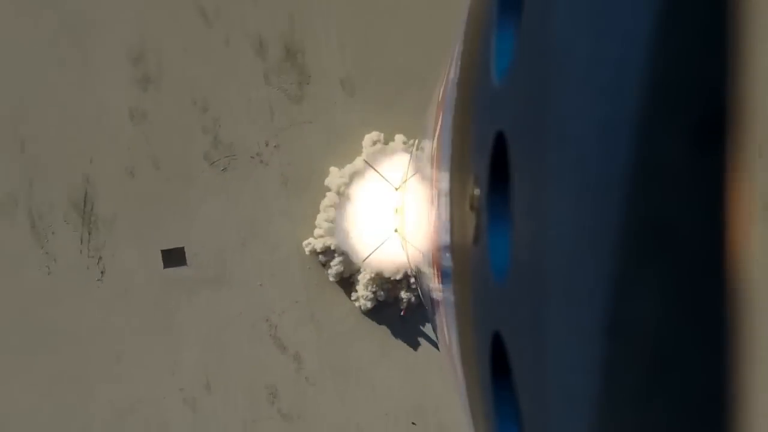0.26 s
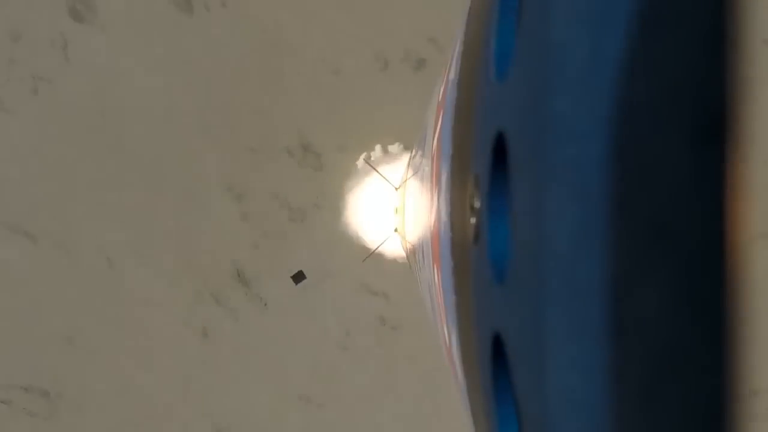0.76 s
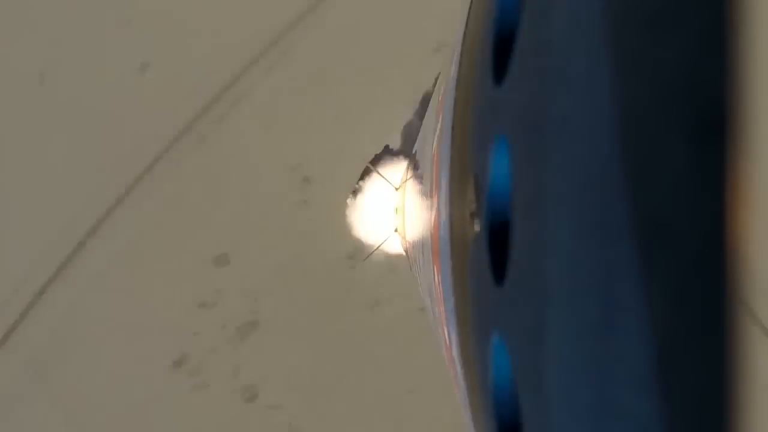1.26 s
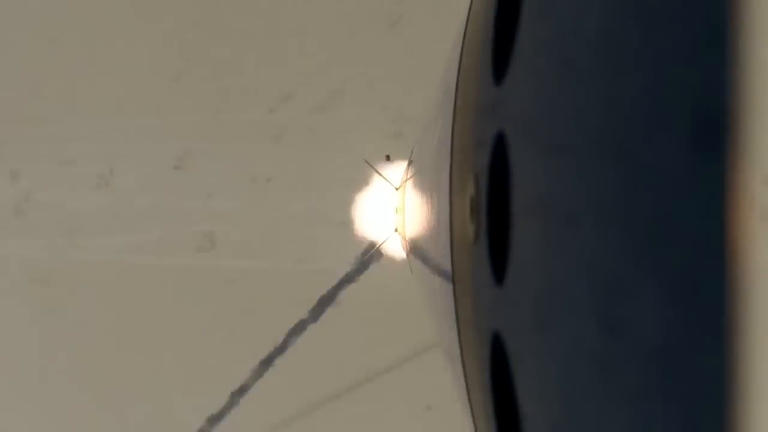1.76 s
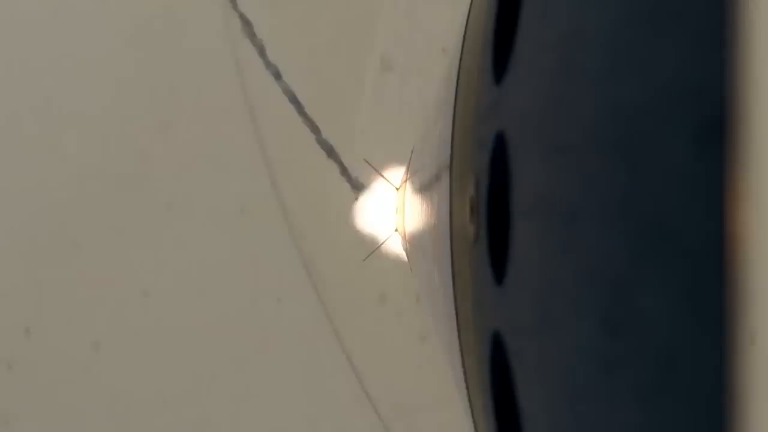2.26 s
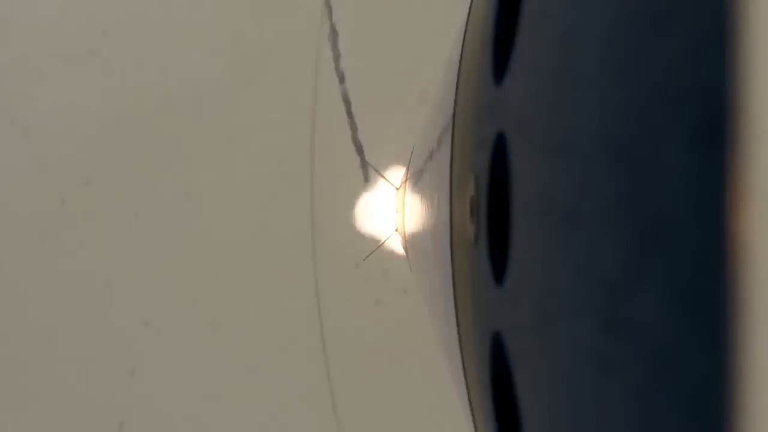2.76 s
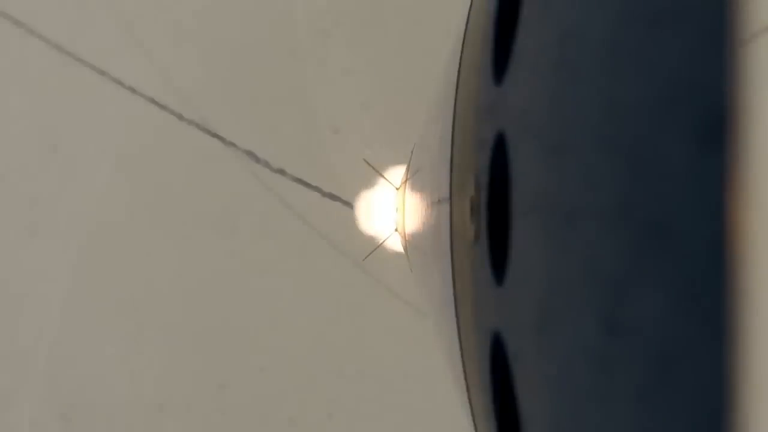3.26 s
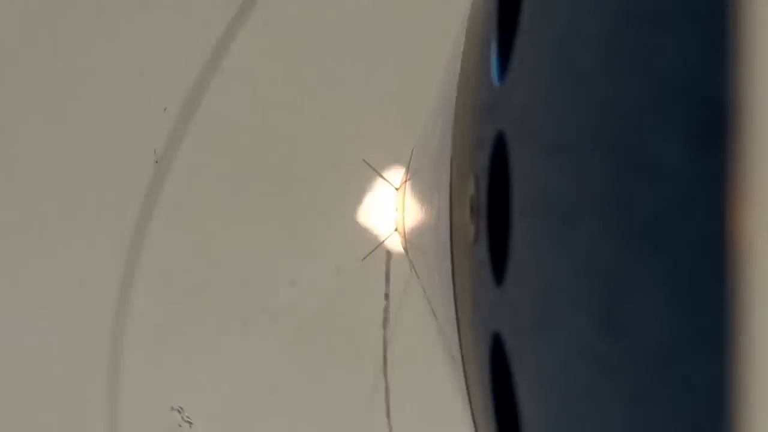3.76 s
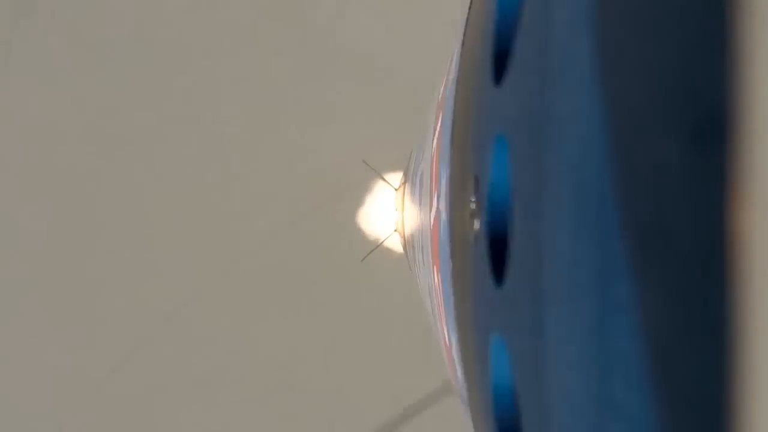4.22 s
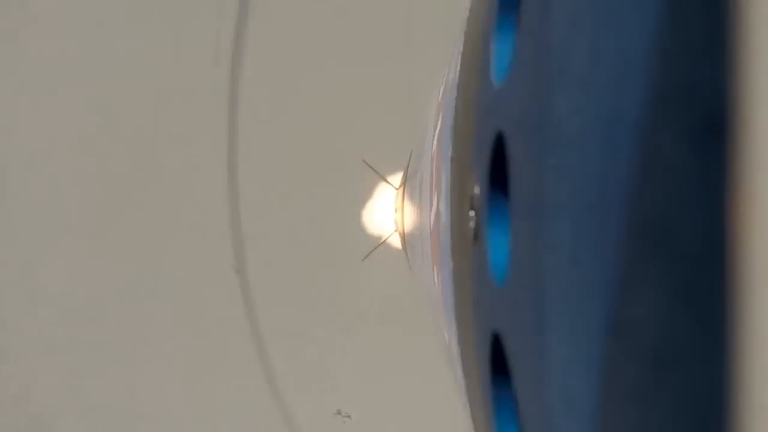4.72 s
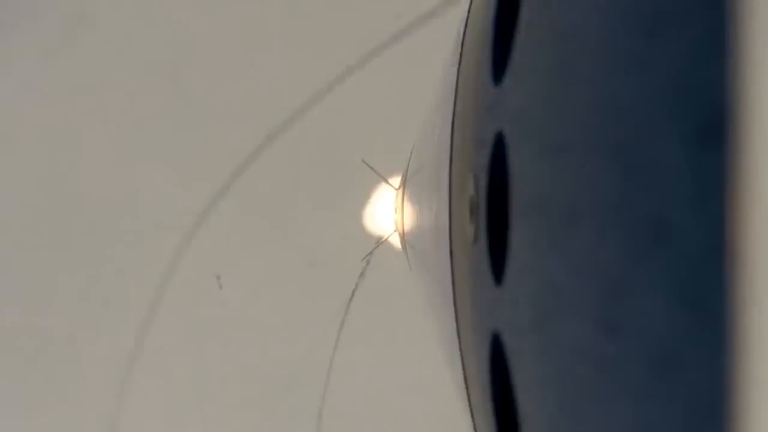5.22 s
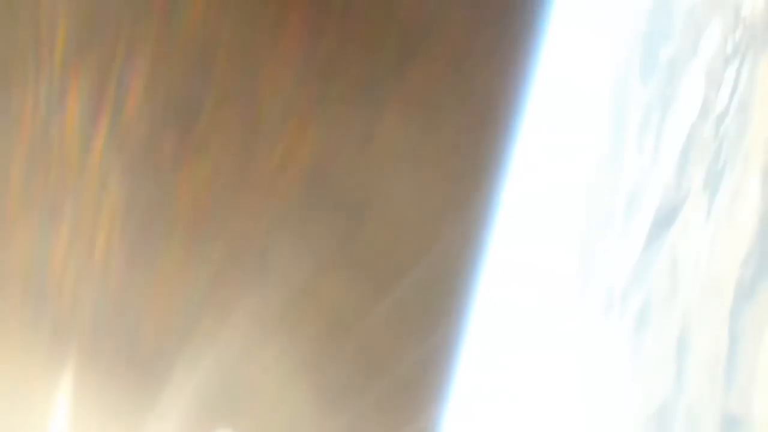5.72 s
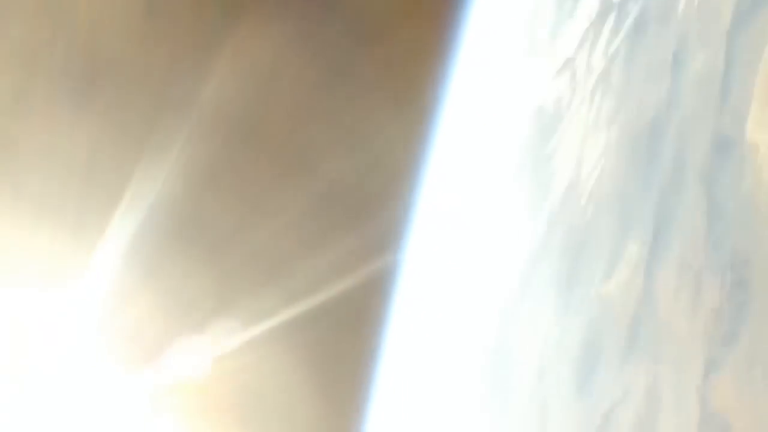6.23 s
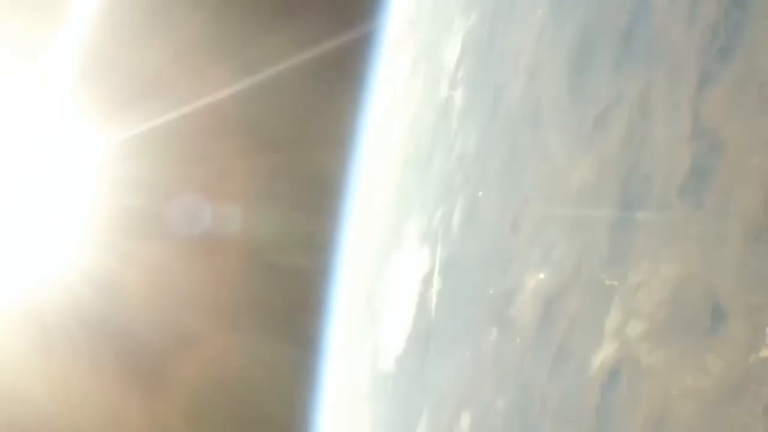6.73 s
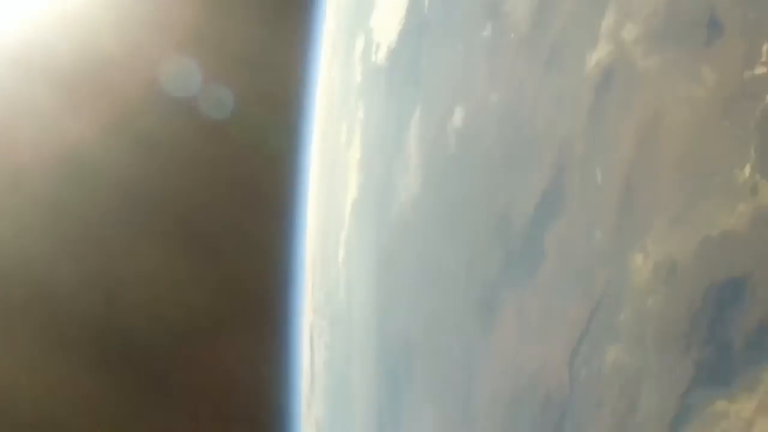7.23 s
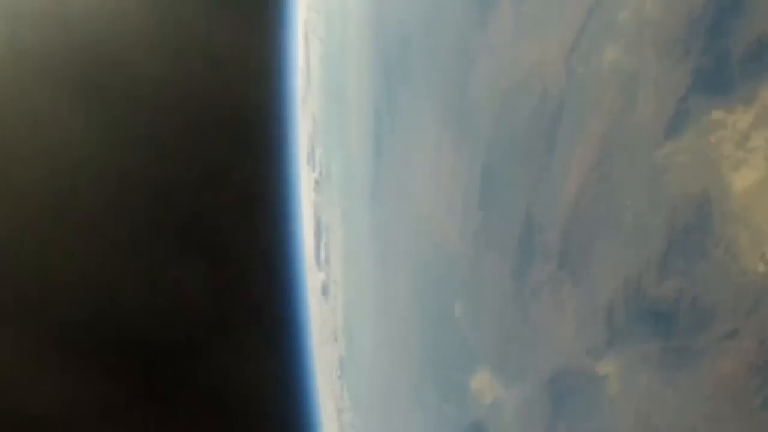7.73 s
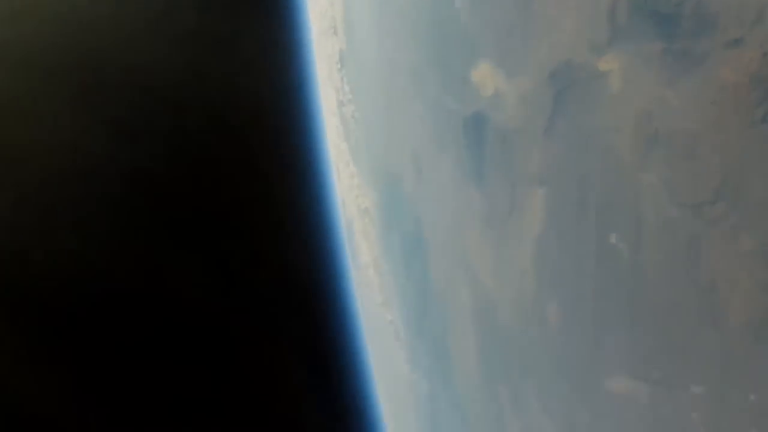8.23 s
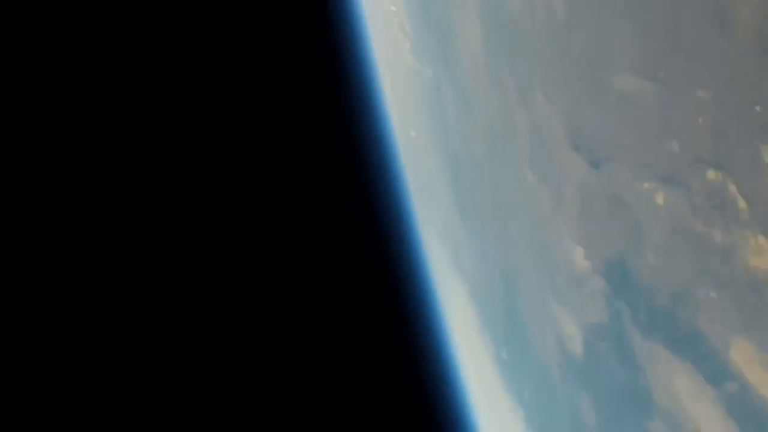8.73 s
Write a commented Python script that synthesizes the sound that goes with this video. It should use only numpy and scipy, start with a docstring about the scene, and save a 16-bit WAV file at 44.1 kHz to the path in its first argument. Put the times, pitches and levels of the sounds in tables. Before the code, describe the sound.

A rocket motor roars loudly, heard from on board, then cuts off abruptly, leaving a faint hush with small knocks and ticks.

```python
"""On the side of a climbing rocket, a camera hears the motor at liftoff. Turbulent jet noise rings through
the resonances of the airframe; the rumble reflected by the ground falls away with height, and the
rushing air brightens with speed. After a hard cut the rocket coasts high up in near silence, where
loose parts inside knock and tick, each impact exciting damped modes of vibration."""
import sys
import numpy as np
from scipy import signal
from scipy.fft import rfft, irfft
from scipy.io import wavfile
from scipy.ndimage import uniform_filter1d

SR = 44100
rng = np.random.default_rng(int(sys.argv[2]) if len(sys.argv) > 2 else 0)


def to_wav(sig):
    """Store sig (one row per channel, or 1-D mono) as 16-bit WAV at the path in sys.argv[1].

    Samples outside -1..1 are clipped; the rate is SR.
    """
    pcm = np.clip(np.atleast_2d(sig), -1, 1) * 32767
    pcm = np.round(pcm).astype(np.int16)
    wavfile.write(sys.argv[1], SR, pcm.T)  # frames by channels


N = 396302
TIME = np.arange(N) / SR
CUT_S, COAST_S = 5.639, 5.847

# base spectrum of the jet noise: frequency_hz, density_db
JET_SPECTRUM = [(20, -57), (45, -50.5), (140, -57), (250, -58), (700, -54), (1500, -52), (2800, -58),
                (5700, -66), (8500, -74), (9500, -79.5), (11700, -84), (12400, -89.5), (13600, -91),
                (14300, -97.5)]
# strength of the roar over the burn: time_s, gain_db
THRUST_CURVE = [(0, 0.4), (.47, 0.7), (.62, 2), (1.35, 2), (2.0, 2.0), (3.1, 0.6), (4.5, -0.5), (5.64, 0)]
# peaks and hollows of the exhaust near the pad: centre_hz, width_hz, gain_db
PAD_BANDS = [(105, 22, 3), (200, 22, -4.5), (370, 24, -2), (496, 25, 3), (600, 51, -7), (2125, 280, -3.5),
             (2370, 31, 5.5), (3530, 45, 2), (7200, 990, 3.5), (7890, 130, 2), (11620, 1800, -1)]
# steady resonances and hollows of the airframe: centre_hz, width_hz, gain_db
AIRFRAME_BANDS = [(98, 10, 1.3), (177, 9, 7.3), (202, 15, 7.3), (600, 29, 6.7), (780, 35, 2.5),
                  (970, 83, 4.8), (1086, 9, 2.0), (1214, 30, 3.4), (1367, 31, 2.1), (1440, 98, 4.1),
                  (1715, 26, 1.7), (1899, 16, 3.0), (2012, 18, 3.2), (2343, 96, 4.4), (3138, 24, -4.1),
                  (3219, 35, 2.3), (3449, 140, 3.5), (3535, 15, 0.8), (3794, 30, 3.1), (3997, 53, 3.0),
                  (4206, 84, -2.1), (4337, 28, 3.9), (4443, 42, 3.0), (4550, 39, -3.1), (4794, 140, 1.5),
                  (5256, 43, 3.2), (5787, 105, -4.9), (6865, 72, -2.2), (7683, 30, 3.8), (7882, 61, 4.9)]
# panel modes that ring hardest midway through the burn: centre_hz, width_hz, peak_gain_db
PANEL_MODES = [(177, 4.9, 4), (1380, 16, 6.5), (3530, 27, 7.5), (3814, 22, 1), (4320, 21, 1.5),
               (7920, 35, 1), (7850, 700, 1)]
# resonances that only fast air excites: centre_hz, width_hz, full_speed_gain_db
FAST_AIR_MODES = [(183, 8.1, 4), (412, 14, 2.5), (4913, 100, 6.5), (6200, 171, 7)]
# howls that swell and pass: peak_s, spread_s, centre_hz, width_hz, gain_db
AIR_HOWLS = [(1.049, 0.41, 1735, 177.7, 8), (1.502, .14, 303, 60.2, 9)]
# background of the coast: frequency_hz, density_db
HUSH_SPECTRUM = [(10, -102), (25, -84), (110, -80.5), (260, -82), (520, -92), (740, -93.5), (900, -100),
                 (2600, -107.5), (4000, -109), (5200, -115), (6050, -127), (7100, -116), (8200, -113),
                 (9500, -118), (15000, -117)]
# impacts of loose parts: start_s, tube_db, bulkhead_db, bracket_db, chatter_s
LOOSE_KNOCKS = [(5.866, -46, -57, -57, .02), (5.895, -45, -65, -68, 0.046), (6.055, -58, -69, -60, .025),
                (6.117, -33.5, -57, -50.5, 0.022), (6.36, -63, -60, -52.5, 0.029),
                (6.575, -62, -60, -57, .045), (6.692, -54, -62, -57, .03), (7.271, -51, -58, -53.5, 0.011),
                (7.307, -54, -62, -55, .015), (7.349, -47, -47, -42, .018), (7.455, -59, -62, -60, 0.012),
                (7.916, -54, -70, -70, .016), (8.139, -40.5, -39, -46, .028), (8.168, -39, -51, -66, 0.031),
                (8.297, -42, -57, -63, .012), (8.535, -66, -67, -60, .015), (8.572, -42, -67, -64, 0.028),
                (8.845, -59, -64, -61, .025)]
# modes that a knock rings: pitch_hz, relative_db, t60_s, part (0 tube, 1 bulkhead, 2 bracket)
BAY_MODES = [(140, -19, .35, 0), (267.7, 3.5, 0.13, 0), (316, -6, 0.17, 0), (408, 9, 0.051, 1),
             (457, -4, 0.057, 1), (685, 1, 0.077, 2), (743, -0.5, 0.082, 2), (1210, -4, 0.04, 2),
             (1720, 0, .05, 2)]
# small hard impacts: start_s, ring_db, contact_db
HARD_TICKS = [(6.117, -54, -58), (6.297, -60, -72), (6.361, -66, -60), (6.62, -66, -76), (6.684, -64, -58),
              (6.803, -70, -72), (7.007, -65, -74), (7.272, -66, -54.5), (7.297, -60, -64),
              (7.578, -62, -72), (8.141, -66, -58), (8.183, -59, -70), (8.825, -59, -68)]
# modes that a tick rings: pitch_hz, relative_db, t60_s
PING_MODES = [(3730, 1, 0.042), (3880, -1, 0.046), (4060, -7, .04), (8150, -5, .05), (8300, -12, .04)]
# colour of a tick's dry scratch as heard through the coarse sampler, with its notch near 6 kHz:
# frequency_hz, relative_db
SAMPLED_SCRATCH_SPECTRUM = [(300, -8), (1200, 1), (2200, -2), (4600, -14), (6050, -25), (7400, -14),
                            (14000, -20)]


def amp(db):
    """The amplitude ratio of a level in decibels."""
    return 10 ** (np.asarray(db) / 20)


def spectrum_db(points, hz):
    """A spectrum interpolated linearly on a log-frequency axis."""
    point_hz, db = np.transpose(points)
    return np.interp(np.log(hz + 1), np.log(point_hz), db)


def bell(v, centre, width):
    """A Gaussian of height 1 whose width is its standard deviation."""
    return np.exp(-.5 * ((v - centre) / width) ** 2)


def bands_db(rows, hz):
    """Gains in cascade add in decibels: one bell for each peak or hollow."""
    return sum(db * bell(hz, centre_hz, width_hz) for centre_hz, width_hz, db in rows)


def unit_rms(x):
    """Normalisation to a mean power of 1."""
    return x / np.sqrt(np.mean(x ** 2) + 1e-20)


def coloured(x, points):
    """Filtering as multiplication in the frequency domain."""
    hz = np.fft.rfftfreq(len(x), 1 / SR)
    return irfft(rfft(x) * amp(spectrum_db(points, hz)), len(x))


def white():
    """White noise has a flat power density, here 0 dB per Hz."""
    return rng.standard_normal(N) * np.sqrt(SR / 2)


def wander(samples):
    """A moving average of noise leaves its slow fluctuations, scaled to rms 1."""
    return unit_rms(uniform_filter1d(rng.standard_normal(N), samples))


def add(mix, start_s, sound):
    """Superposition: a sound adds to the mix from start_s on."""
    part = mix[round(start_s * SR):][:len(sound)]
    part += sound[:len(part)]


def jet_roar(eddy_db=0.75, low_cut_hz=21):
    """Source and filter: turbulence makes broadband noise, which ground, airframe and airflow colour."""
    frames = dict(fs=SR, nperseg=4096, noverlap=3072)
    hz, t, noise = signal.stft(white(), **frames)
    hz = hz[:, None]
    db = spectrum_db(JET_SPECTRUM, hz) + ground_db(hz, t) + airframe_db(hz, t)
    db += wall_ripple_db(hz, t) + airflow_db(hz, t)
    # eddies lift patches of the spectrum for a moment
    eddies = uniform_filter1d(rng.standard_normal(noise.shape), 24, axis=0)
    db += eddy_db * unit_rms(uniform_filter1d(eddies, 3, axis=1))
    sound = signal.istft(noise * amp(db), **frames)[1][:N]
    sound = signal.sosfilt(signal.butter(4, low_cut_hz, "high", fs=SR, output="sos"), sound)
    return sound * amp(burn_db())


def burn_db(flutter_db=0.29, surge_db=0.45, sag_db=-3, sag_start_s=1.69, sag_end_s=1.795, edge_s=0.01265):
    """Amplitude modulation: the roar follows thrust, sags once, and wavers with uneven burning."""
    thrust = np.interp(TIME, *np.transpose(THRUST_CURVE))
    sag = (np.tanh((TIME - sag_start_s) / edge_s) - np.tanh((TIME - sag_end_s) / edge_s)) / 2
    return thrust + sag_db * sag + flutter_db * wander(500) + surge_db * wander(4000)


def ground_db(hz, t, near_db=17, far_db=-1.8, corner_hz=125, rumble_half_s=1.03, pad_half_s=1.32):
    """Ground reflection reinforces the bass; it fades with height, as does the exhaust's pad colour."""
    nearness = 1 / (1 + (t / rumble_half_s) ** 2.5)
    rumble = (far_db + (near_db - far_db) * nearness) / (1 + (hz / corner_hz) ** 6)
    return rumble + bands_db(PAD_BANDS, hz) / (1 + (t / pad_half_s) ** 4)


def airframe_db(hz, t, tube_db=14, rest_hz=439, fast_hz=407, boom_rest_db=-2.5, boom_fast_db=2.45):
    """Forced resonance: the body favours its modes; the tube's sinks and booms harder with speed."""
    speed = np.minimum(t / CUT_S, 1)
    tube = tube_db * bell(hz, rest_hz + (fast_hz - rest_hz) * speed, width=76.2)
    booming = (1 + np.tanh((t - 2.78) / .8)) / 2  # half grown at 2.78 s
    boom = (boom_rest_db + (boom_fast_db - boom_rest_db) * booming) * bell(hz, centre=414, width=140)
    panels = bands_db(PANEL_MODES, hz) * bell(t, centre=2.35, width=1.1)
    fast_modes = bands_db(FAST_AIR_MODES, hz) * speed ** 2.8
    return bands_db(AIRFRAME_BANDS, hz) + tube + boom + panels + fast_modes


def wall_ripple_db(hz, t, depth_db=1.9, corner_hz=3000, fade_s=8):
    """Modal overlap: countless weak wall modes ripple the treble until the rush of air masks them."""
    modes = uniform_filter1d(rng.standard_normal(hz.shape), 4, axis=0)
    ripple = unit_rms(uniform_filter1d(modes, 3, axis=0))
    return depth_db * ripple * hz / (hz + corner_hz) * np.exp(-t / fade_s)


def airflow_db(hz, t, settle_s=1.23, corner_hz=1500, whistle_db=3.5, whistle_hz_per_s=3770):
    """Flow noise moves up in frequency with speed: the treble brightens, howls pass, a whistle rises."""
    rest_slope, fast_slope = -10.5, 1.04  # dB per octave
    slope = fast_slope + (rest_slope - fast_slope) * np.exp(-t / settle_s)
    octaves = np.log2(1 + (hz / corner_hz) ** 2) / 2
    howls = sum(db * bell(t, peak_s, spread_s) * bell(hz, centre_hz, width_hz)
                for peak_s, spread_s, centre_hz, width_hz, db in AIR_HOWLS)
    pitch_hz = 2600 + whistle_hz_per_s * t
    whistle = whistle_db * bell(t, centre=2.4, width=.45) * bell(hz, pitch_hz, width=.018 * pitch_hz)
    return slope * octaves + howls + whistle


def hush(gain_db=0.35, waver_db=0.9):
    """Slow random modulation of low noise gives a slightly wavering hush."""
    level_db = gain_db + waver_db * wander(3000)
    return coloured(white(), HUSH_SPECTRUM) * amp(level_db)


def knock(levels_db, chatter_s, bounce=0.29, dull_hz=900, low_cut_hz=170):
    """Impulse response: a loose part lands and chatters, each soft contact ringing the bay's modes."""
    t = np.arange(SR // 3) / SR
    contacts = np.zeros(len(t))
    rebounds = (rng.random(6) * chatter_s * SR).astype(int)
    contacts[rebounds] = bounce * rng.standard_normal(len(rebounds))
    contacts[0] = 1
    contacts = signal.sosfilt(signal.butter(4, dull_hz, fs=SR, output="sos"), contacts)
    contacts = signal.sosfilt(signal.butter(2, low_cut_hz, "high", fs=SR, output="sos"), contacts)
    sound = np.zeros(len(t))
    for struck, level_db in enumerate(levels_db):
        response = sum(amp(db - 60 * t / t60_s) * np.sin(2 * np.pi * hz * t)
                       for hz, db, t60_s, part in BAY_MODES if part == struck)
        ring = signal.fftconvolve(contacts, response)[:len(t)]
        # the heavy tube takes longer to start ringing than the light parts
        rise_s = 0.75 * chatter_s / (1 + struck) ** 2
        ring *= 1 - np.exp(-t / rise_s)
        power = np.sum(ring ** 2) / (0.027 * SR)  # as if all its energy fell within 27 ms
        sound += amp(level_db) * ring / np.sqrt(power)
    return sound


def sampler_images(x, clock_hz=11985, image_db=-29.0):
    """Spectral imaging: a coarse sampler mirrors the low knocks faintly about its clock rate."""
    low = signal.sosfilt(signal.butter(2, [250, 1000], "band", fs=SR, output="sos"), x)
    return amp(image_db) * 2 * low * np.cos(2 * np.pi * clock_hz * TIME)


def tick(ring_db, contact_db, scratch_t60_s=0.092, rise_s=0.0015):
    """A brief, hard contact excites high modes: a short bright ping with a dry scratch."""
    t = np.arange(SR // 10) / SR
    ping = sum(amp(db - 60 * t / t60_s) * np.sin(2 * np.pi * (hz * t + rng.random()))
               for hz, db, t60_s in PING_MODES)
    noise = unit_rms(coloured(rng.standard_normal(len(t)), SAMPLED_SCRATCH_SPECTRUM))
    scratch = amp(-60 * t / scratch_t60_s) * noise
    return (amp(ring_db) * ping + amp(contact_db) * scratch) * (1 - np.exp(-t / rise_s))


def coast():
    """With no roar to mask them, knocks and ticks stand out over the hush."""
    sound = hush()
    for start_s, *levels_db, chatter_s in LOOSE_KNOCKS:
        add(sound, start_s, knock(levels_db, chatter_s))
    for start_s, ring_db, contact_db in HARD_TICKS:
        add(sound, start_s, tick(ring_db, contact_db))
    return sound


def scene(snap_db=-22, tail_db=-26.5, tail_t60_s=0.058):
    """Superposition in mono: the roar stops with a snap and a faint tail; silence, then the coast."""
    since_cut_s = np.maximum(TIME - CUT_S, 0)
    burn_gate = np.where(TIME < CUT_S, 1, amp(tail_db - 60 * since_cut_s / tail_t60_s))
    burn_gate *= np.minimum(TIME / .003, 1)  # 3 ms onset
    coasting = coast() * (TIME > COAST_S)
    mono = jet_roar() * burn_gate + coasting + sampler_images(coasting)
    add(mono, CUT_S, amp(snap_db) * np.array([1, -1]))
    return np.array([mono, mono])


def record(dry, edge_hz=14550):
    """Band limiting: the camera acts as a steep low-pass filter."""
    low_pass = signal.firwin(255, edge_hz, window=("kaiser", 9), fs=SR)
    return signal.oaconvolve(dry, low_pass[None], "same")


dry = scene()
out = record(dry)
to_wav(out)
```